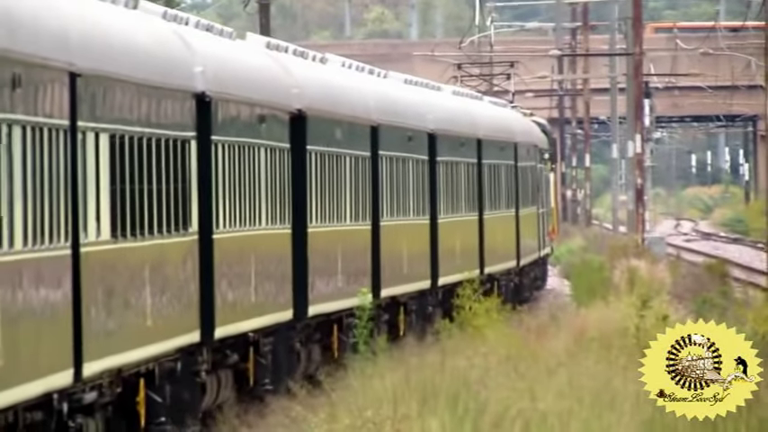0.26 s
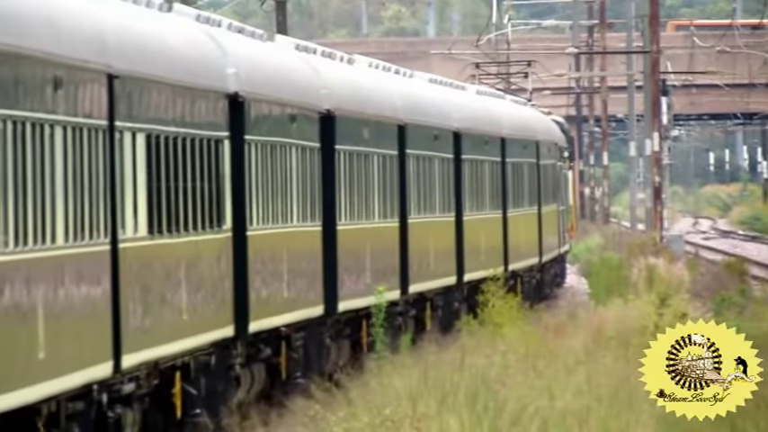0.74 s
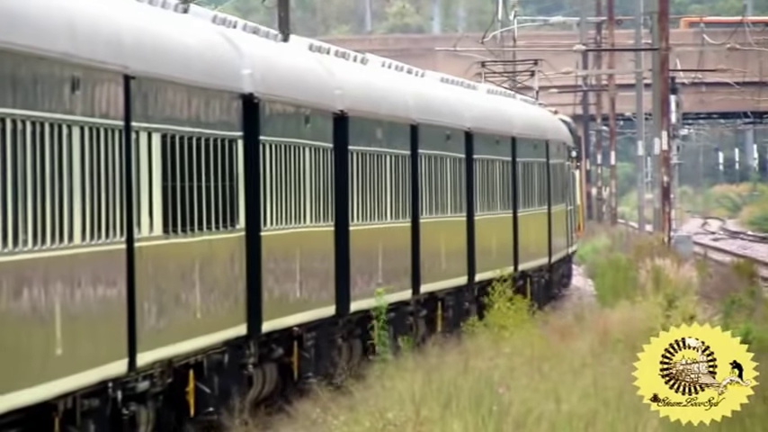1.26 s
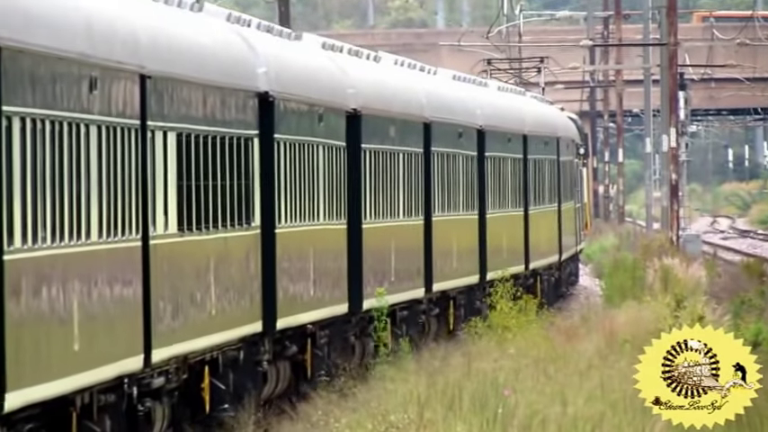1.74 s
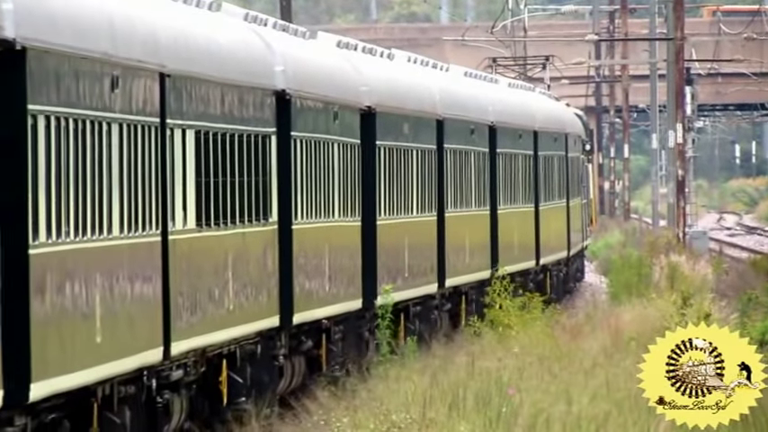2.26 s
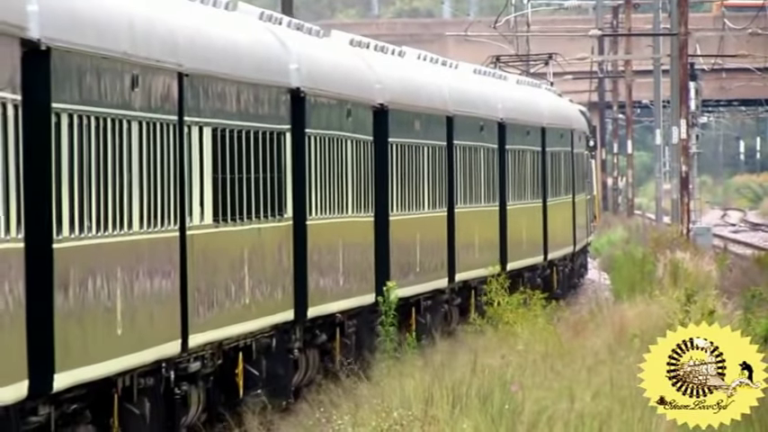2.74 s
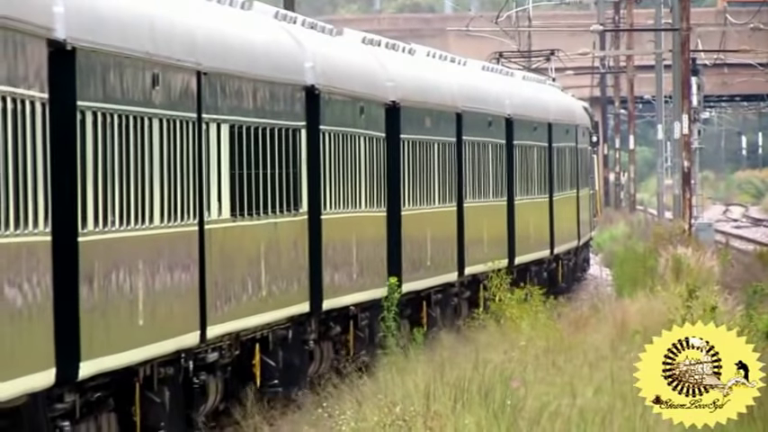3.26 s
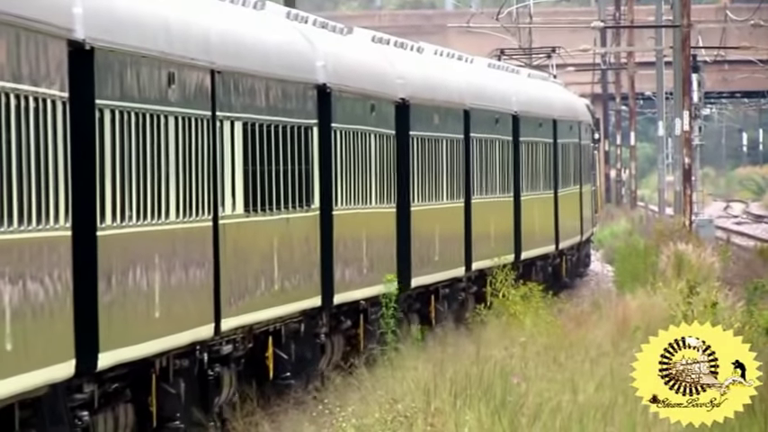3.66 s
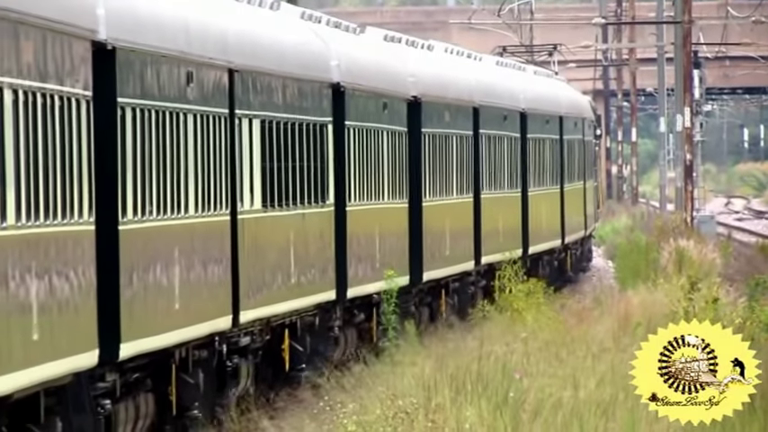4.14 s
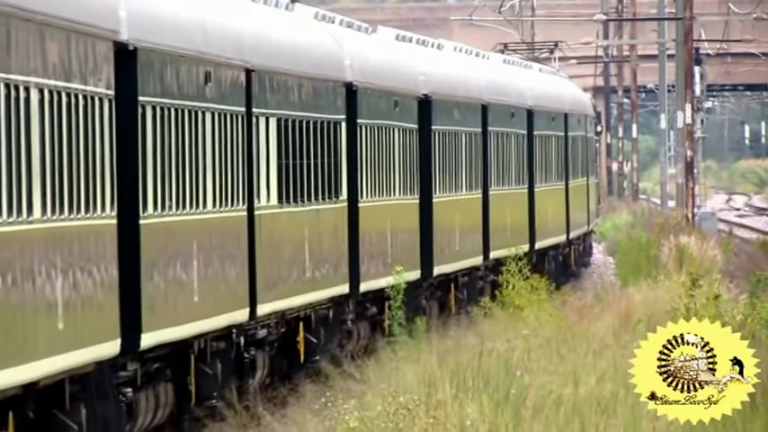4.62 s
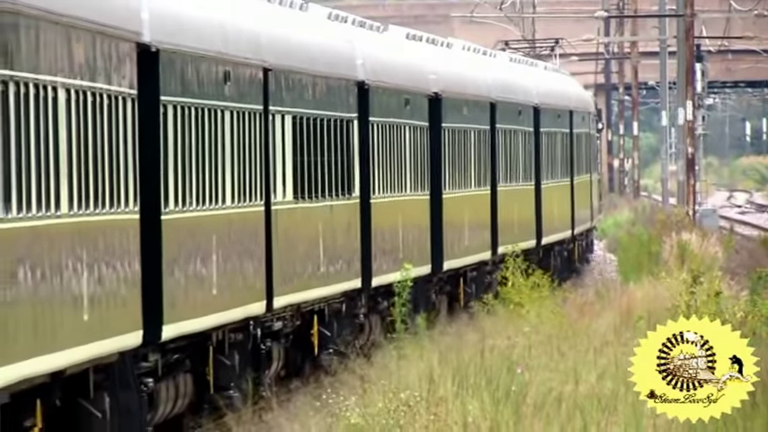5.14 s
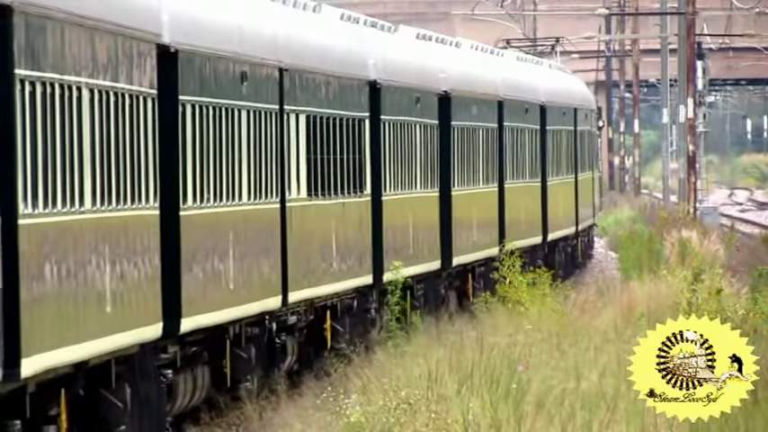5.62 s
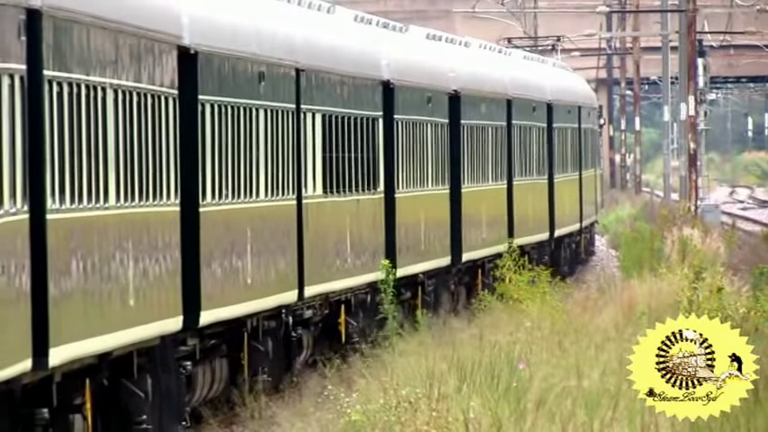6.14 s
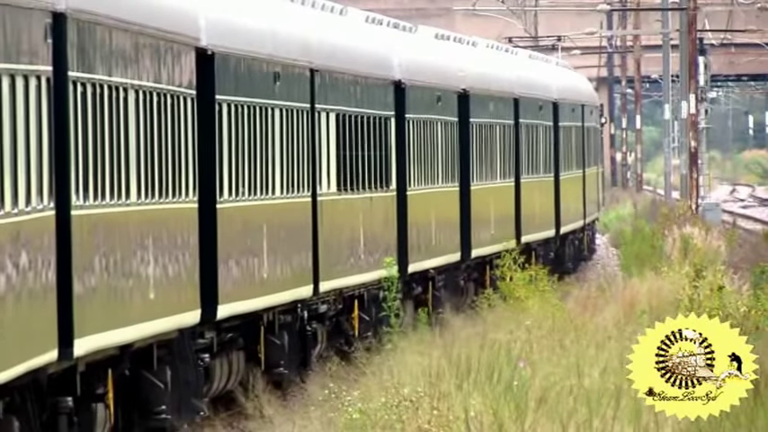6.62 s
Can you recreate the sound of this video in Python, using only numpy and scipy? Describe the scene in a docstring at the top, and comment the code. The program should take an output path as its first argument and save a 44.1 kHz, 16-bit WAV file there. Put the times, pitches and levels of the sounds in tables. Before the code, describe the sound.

A few metres from a curved outdoor track, passenger coaches roll slowly past, nearer the left side. Low rumble, mid-range rail roar and faint wheel hiss continue throughout. Heavy clanking thumps arrive early in quick groups, then lighter knocks, another strong hit past the middle, and more clatter near the end. Loose links tick and short dull echoes scatter beneath the floors.

```python
"""Coaches rolling over rail joints

Passenger coaches roll slowly past on a curve, a few metres away, their layers of shaped noise swelling and fading.
Steel wheels roar on the rails over the rumble of the coach bodies. Axle after axle drops into a rail joint:
low sine bounces thump the track, the bogie (wheel frame) knocks, and short noise bursts clank as steel.
Loose running gear rattles as ticks and knocks, and a short tail scatters under the coach floors."""
import sys
import numpy as np
from scipy import signal
from scipy.fft import rfft, irfft, next_fast_len
from scipy.io import wavfile
from scipy.ndimage import uniform_filter1d

SR = 44100
rng = np.random.default_rng(int(sys.argv[2]) if len(sys.argv) > 2 else 0)


def wav_record(signal):
    """Record a signal, one row per channel, as 16-bit PCM in the file named by sys.argv[1]."""
    frames = np.transpose(np.atleast_2d(signal))
    bounded = np.clip(frames, -1, 1)
    # unit amplitude maps onto the largest positive 16-bit level
    quanta = np.round(bounded * 32767).astype(np.int16)
    wavfile.write(sys.argv[1], SR, quanta)


N = 303849  # length [samples]

# In all noise colour tables only the shape counts: noise() evens out the overall level.


def amp(db):
    """Turns decibels into a gain."""
    return 10 ** (np.asarray(db) / 20)


def unit(x):
    """Scales to an average strength (rms) of 1."""
    return x / np.sqrt(np.mean(x ** 2) + 1e-20)


def read(points, hz):
    """Reads a table between its points, on a log-frequency axis."""
    f, value = np.transpose(points)
    return np.interp(np.log(hz + 1), np.log(f + 1), value)


def add(mix, s, sound):
    """Mixes a sound in at time s."""
    part = mix[:, max(round(s * SR), 0):][:, :sound.shape[-1]]
    part += sound[..., :part.shape[1]]


def level(points):
    """Gain over time from a table of (time [s], level [dB])."""
    return amp(np.interp(np.arange(N) / SR, *np.transpose(points)))


# resonances of wheel and rail at full share: (pitch [Hz], width [Hz], lift [dB])
STEEL_RESONANCES = [(530, 30, -2.5), (589, 25, 1.5), (1017, 61, 5), (1294, 99, 2.5), (1495, 77, -1.5),
                    (1685, 120, 4), (2098, 150, 4.5), (2506, 140, 3.5)]


def steel_db(hz, variety=0.):
    """Lift [dB] by the wheel and rail resonances; with variety, every call favours them differently."""
    favour = 1 + variety * rng.standard_normal(len(STEEL_RESONANCES))
    lifts = 0
    for k, (f, width, db) in zip(favour, STEEL_RESONANCES):
        lifts = lifts + k * db * np.exp(-((hz - f) / width) ** 2)
    return lifts


# how alike left and right are at spread 1, before limiting to 0-1: (frequency [Hz], likeness [1 = same])
LEFT_RIGHT_LIKENESS = [(60, 0.8), (130, 1.23), (330, 0.64), (600, 0.57), (800, 1.42), (1300, 0.48),
                       (1600, 0.31), (2400, 0.76), (3100, 0), (3600, 0.58), (4400, .5), (5400, 0.35),
                       (6200, -0.4)]


def noise(spectrum, spread=1., variety=0., lift=1., size=N):
    """Stereo noise coloured by a share (lift) of the steel; a small spread is a compact source, alike on both sides."""
    hz = np.fft.rfftfreq(size, 1 / SR)
    a, b, c, d = rng.standard_normal((4, len(hz)))
    same = np.clip(1 - spread * (1 - read(LEFT_RIGHT_LIKENESS, hz)), 0, 1)
    left = a + 1j * b
    right = same * left + np.sqrt(1 - same ** 2) * (c + 1j * d)
    colour_db = read(spectrum, hz) + lift * steel_db(hz, variety)
    return unit(irfft(np.array([left, right]) * amp(colour_db), size))


def uneven(x, patch_db, flutter_db, size=10, count=2):
    """Rough treads: patches of pitch and time swell and fade, and the whole band flutters."""
    z = signal.stft(x, nperseg=2048, noverlap=1536)[2]
    patches = rng.standard_normal(z.shape[1:])
    # each patch is count frames long and size frequency bins wide
    patches = uniform_filter1d(patches, size=count, axis=1)
    patches = unit(uniform_filter1d(patches, size=size, axis=0))
    flutter = unit(uniform_filter1d(rng.standard_normal(z.shape[2]), size=6))
    z = z * amp(patch_db * patches + flutter_db * flutter)
    return unit(signal.istft(z, nperseg=2048, noverlap=1536)[1][:, :N])


def swell(t, peak_s):
    """Envelope of a cushioned blow: builds to 1 at peak_s and dies away."""
    return (t / peak_s * np.exp(1 - t / peak_s)) ** 2


def strike(t, rise_s, decay_s):
    """Envelope of a harder blow: it rises smoothly while the ring decays; its peak is 1."""
    envelope = (1 - np.exp(-(t / rise_s) ** 2)) * np.exp(-t / max(decay_s, .003))
    return envelope / envelope.max()


def chatter(t, depth_db=5, size=130):
    """Steel meets steel in many tiny impacts, a few milliseconds apart."""
    jolts = np.tanh(unit(uniform_filter1d(rng.standard_normal(len(t)), size=size)))
    return unit(amp(depth_db * jolts))


# rolling swells as the bogies at the coach ends come near; only ups and downs around the average count,
# and ground, rumble, rails and hiss each follow their own share of them: (time [s], level [dB])
BOGIE_NEARNESS = [(0.0, -34.5), (0.3, -35), (0.5, -33), (0.77, -34.5), (2.19, -35), (2.32, -35.5),
                  (2.9, -36), (4.11, -32.5), (5.37, -33.5), (5.74, -35.5), (6.89, -32.5)]


def passing(level_db, follows, fade_db_per_s=0.):
    """Gain of a rolling layer: it follows a share of the bogies' swell and may drift slowly along the train."""
    t = np.arange(N) / SR
    near_db = np.interp(t, *np.transpose(BOGIE_NEARNESS))
    return amp(level_db + follows * (near_db - near_db.mean()) - fade_db_per_s * (t - t.mean()))


# colour of the shaking track bed: (frequency [Hz], level per Hz [dB])
GROUND_COLOUR = [(12, -13.5), (25, -4), (38, 4.5), (62, 2.5), (105, 4.5), (140, 1), (200, -16),
                 (500, -72.5)]


def ground():
    """The track bed shakes under the passing weight: deep noise."""
    shaking = uneven(noise(GROUND_COLOUR, spread=1.2), patch_db=1.0, flutter_db=1.1, size=2, count=10)
    return shaking * passing(-43.5, follows=0.46)


# colour of the coach bodies: (frequency [Hz], level per Hz [dB])
RUMBLE_COLOUR = [(70, -18.5), (160, -3.5), (200, -1), (270, 3), (340, -0.1), (420, -3.5), (520, -3.5),
                 (700, -12), (1100, -13), (3000, -83.5)]


def rumble():
    """The large coach bodies rumble: low noise that follows the bogies closely."""
    bodies = uneven(noise(RUMBLE_COLOUR), patch_db=1.7, flutter_db=0.5, size=3, count=7)
    return bodies * passing(-32.5, follows=1.12, fade_db_per_s=0.37)


# colour of the roaring rails: (frequency [Hz], level per Hz [dB])
RAIL_COLOUR = [(200, -20.5), (500, -1.5), (750, -5.5), (1100, -1), (1350, -0.5), (1600, -9), (2500, -29.5),
               (6000, -75)]


def rails():
    """The rails roar under the wheels: noise in the middle range."""
    roar = uneven(noise(RAIL_COLOUR), patch_db=1.43, flutter_db=-0.74, size=3, count=7)
    return roar * passing(-35.5, follows=0.34, fade_db_per_s=0.5)


# colour of the rolling wheels: (frequency [Hz], level per Hz [dB])
WHEEL_COLOUR = [(900, -20), (1350, -7.5), (1650, 2.5), (2200, 0.5), (2750, -2), (3300, -5), (4000, -9),
                (6000, -27), (10000, -66.5)]
# the wheels ring loudest as the first bogie comes near: (time [s], level [dB])
WHEEL_LOUDNESS = [(0, -38), (.3, -38.5), (.55, -35.5), (.8, -37), (1.5, -39), (2.5, -41.5), (3.3, -41),
                  (4.1, -39), (4.9, -39.5), (5.4, -39.5), (5.8, -43.5), (6.89, -39.5)]


def wheels():
    """The rolling wheels ring: noise gathered around the steel's own pitches."""
    ring = uneven(noise(WHEEL_COLOUR), patch_db=1.54, flutter_db=0.78, size=3, count=9)
    return ring * level(WHEEL_LOUDNESS)


# colour of the spots where wheel touches rail: (frequency [Hz], level per Hz [dB])
HISS_COLOUR = [(1500, -18.5), (3000, 5.5), (4000, 1.5), (5000, 2), (5900, -1.5), (7000, -8.5),
               (8000, -15.5), (8900, -22.5), (9500, -57.5)]


def hiss():
    """The small spots where wheel touches rail hiss: high noise."""
    contact = uneven(noise(HISS_COLOUR, spread=0.72), patch_db=3.0, flutter_db=1.0, size=2, count=10)
    return contact * passing(-48.5, follows=0.98, fade_db_per_s=-0.06)


# colour of a flange (wheel rim) on the curve: (frequency [Hz], level per Hz [dB])
FLANGE_COLOUR = [(4000, -45.5), (5400, -4), (5850, 3), (6300, -10.5), (8000, -48)]
# loudness of the flange: (time [s], level [dB])
FLANGE_LOUDNESS = [(0, -60), (1.4, -60.5), (2.3, -72.5), (6.89, -75)]


def flange():
    """A flange rubs along the curve: a thin hiss in a narrow band."""
    return noise(FLANGE_COLOUR) * level(FLANGE_LOUDNESS)


def rolling():
    """All the steady sounds of the rolling train together."""
    return ground() + rumble() + rails() + wheels() + hiss() + flange()


# the coach body shudders on its springs after a heavy blow:
# (time [s], level [dB], average pitch [Hz], decay [s])
BODY_SHUDDERS = [(0.625, -30, 94.4, 0.05), (0.974, -30, 106.3, 0.072), (1.735, -27, 99.4, 0.081),
                 (2.041, -33.5, 95, .12), (4.475, -28, 101, 0.058), (5.21, -34.5, 102.7, 0.029),
                 (5.55, -35.5, 92, 0.098)]


def shudders(rise_s=0.023, waver=0.042, size=24000):
    """The coach body drones on at a low, slightly unsteady pitch."""
    out, t = np.zeros((2, N)), np.arange(size) / SR
    for s, db, hz, decay_s in BODY_SHUDDERS:
        drift = unit(uniform_filter1d(rng.standard_normal(size), size=1200))
        turns = np.cumsum(hz * (1 + waver * drift)) / SR
        add(out, s, amp(db) * np.sin(2 * np.pi * turns) * strike(t, rise_s, decay_s))
    return out


def underframe(x, echo_db=-9.5, decay_s=0.048, size=20000):
    """Blows scatter between the coach floors and the ballast (track stones), leaving a short dull tail."""
    t = np.arange(size) / SR
    hits = rng.standard_normal((2, size))
    kept = rng.random((2, size)) < 2000 / SR  # about 2000 echoes per second
    taps = hits * kept * strike(t, 0.012, decay_s)
    tail = signal.fftconvolve(x, taps / np.linalg.norm(taps[0]), axes=1)[:, :N]
    dull = signal.butter(1, [150, 2500], "band", fs=SR, output="sos")
    return amp(echo_db) * signal.sosfilt(dull, tail)


# colour of the bogie's knock, also used by frames() and knock(): (frequency [Hz], level per Hz [dB])
KNOCK_COLOUR = [(60, -24), (170, -3.5), (240, 8.5), (290, 7), (400, -8.5), (530, -10), (700, -9.5),
                (1400, -8.5), (5000, -74)]
# colour of a sharp crack, also used by blow(): (frequency [Hz], level per Hz [dB])
CRACK_COLOUR = [(1200, -14.5), (2000, 2), (3100, 11.5), (4000, 9), (5500, 3.5), (7000, -9), (8500, -18.5),
                (10000, -70)]


def rattles(per_s=12.0, knock_db=-42.5, chink_db=-55.5, size=4096):
    """Couplings and fittings knock and chink lightly at random."""
    t = np.arange(size) / SR
    chance, strength = rng.random((2, N))
    jolts = (chance < per_s / SR) * amp(-9. * strength)
    envelope = signal.oaconvolve(jolts, strike(t, 0.005, 0.031))[:N]
    knocks = amp(knock_db) * noise(KNOCK_COLOUR, spread=0.65)
    chinks = amp(chink_db) * noise(CRACK_COLOUR, spread=.6)
    return envelope * (knocks + chinks)


# a wheel flange rubs the rail head for a moment: (time [s], level [dB], pitch [Hz], length [s])
FLANGE_SCRAPES = [(0.24, -37, 2400, 0.074), (2.008, -38, 2540, 0.048), (5.175, -41, 2300, 0.046)]
# colour of a scrape around its pitch: (multiple of the pitch [1], level per Hz [dB])
SCRAPE_COLOUR = [(.6, -41), (.9, -5), (1, 1.5), (1.12, -14), (1.65, -15), (2.6, -62)]


def scrapes():
    """A flange grazes the rail: a short gritty rasp that swells and stops."""
    out, t = np.zeros((2, N)), np.arange(8192) / SR
    for s, db, hz, length_s in FLANGE_SCRAPES:
        arch = np.sqrt(abs(np.sin(np.pi * np.minimum(t / length_s, 1))))
        band = [(hz * multiple, lift) for multiple, lift in SCRAPE_COLOUR]
        rasp = noise(band, spread=0.35, lift=0, size=len(t))
        add(out, s, amp(db) * rasp * arch * chatter(t))
    return out


# loose links of the brake rigging (rods) rattle: (time [s], level [dB], pitch [Hz], decay [s])
LOOSE_LINKS = [(0.242, -39, 3600, .03), (0.933, -33.5, 3960, .014), (0.957, -33.5, 3700, .014),
               (0.975, -32.5, 2300, .012), (0.985, -36.5, 3700, .018), (1.652, -37, 2660, .01),
               (1.668, -36, 2400, 0.012), (1.688, -36, 3560, .014), (1.718, -38, 2500, .012),
               (3.495, -40.5, 3880, .012), (4.432, -24, 2950, .008), (4.474, -34.5, 2400, .022),
               (5.184, -38, 2600, .008), (5.205, -33, 2900, 0.0085), (5.532, -43, 2600, 0.011),
               (6.261, -40, 3600, 0.01), (6.606, -39, 3320, 0.012), (6.621, -43, 4600, .014),
               (6.655, -46, 4200, .014), (6.71, -40, 4000, .008), (6.735, -42, 3700, .014),
               (6.773, -51, 4200, .01)]
# colour of a link around its pitch: (multiple of the pitch [1], level per Hz [dB])
LINK_COLOUR = [(.35, -27.5), (.6, -3), (1, 3), (1.25, -7.5), (1.55, -13), (2.1, -31.5), (3, -60)]


def links(rise_s=0.0016, size=6000):
    """A loose steel link gives a crisp tick and chatters to rest."""
    out, t = np.zeros((2, N)), np.arange(size) / SR
    for s, db, hz, decay_s in LOOSE_LINKS:
        band = [(hz * multiple, lift) for multiple, lift in LINK_COLOUR]
        ring = noise(band, spread=0.37, lift=0, size=size)
        add(out, s, amp(db) * ring * strike(t, rise_s, decay_s) * chatter(t))
    return out


# the bogie frames knock against their stops: (time [s], level [dB], pitch [Hz])
STOP_KNOCKS = [(0.427, -24.5, 407), (0.599, -25, 225), (0.933, -17, 231.5), (0.984, -28, 292),
               (1.655, -24, 220), (1.684, -28, 498), (1.707, -15, 279), (2.02, -30.5, 230),
               (3.119, -16.5, 296), (3.238, -27.5, 213), (3.425, -25.5, 223), (3.623, -26, 252),
               (4.085, -26.5, 327), (4.436, -24.5, 212), (5.18, -29.5, 324), (5.2, -22.5, 271),
               (5.24, -23.5, 268), (5.533, -23, 286), (6.268, -23, 417), (6.479, -24, 205),
               (6.603, -21.5, 228), (6.709, -21.5, 307), (6.86, -25.5, 327)]


def frames(rise_s=0.0035, ring_cycles=2.3, overtone=1.72, overtone_db=-9, clatter_db=-10, size=6000):
    """A bogie frame hits its stop: a hollow knock of a few cycles, an overtone and some clatter."""
    out, t = np.zeros((2, N)), np.arange(size) / SR
    for s, db, hz in STOP_KNOCKS:
        tone = np.sin(2 * np.pi * hz * t)
        tone = tone + amp(overtone_db) * np.sin(2 * np.pi * (overtone * hz * t + rng.random()))
        clatter = amp(clatter_db) * noise(KNOCK_COLOUR, spread=0.68, size=size)
        add(out, s, amp(db) * (tone + clatter) * strike(t, rise_s, ring_cycles / hz))
    return out


def thump(t, track_hz=104.2, peak_s=0.013):
    """The axle's weight bounces on the sprung track for a few cycles, each time at a slightly other pitch."""
    return -swell(t, peak_s) * np.sin(2 * np.pi * track_hz * rng.uniform(0.87, 1.05) * t)


def knock(t, frame_hz=296.0, peak_s=0.0096, clatter_db=-1.5):
    """The bogie frame answers with one short tone near frame_hz and a clatter of its parts."""
    tone = swell(t, peak_s) * np.sin(2 * np.pi * frame_hz * rng.uniform(0.92, 1.095) * t)
    clatter = noise(KNOCK_COLOUR, spread=0.33, size=len(t)) * strike(t, 0.0033, 0.037)
    return tone + amp(clatter_db) * clatter


# tones a blow leaves ringing in a wheelset (two wheels on an axle), before random detuning and level
# scatter; levels are relative to the clank or clink: (pitch [Hz], level [dB], decay [s])
WHEELSET_TONES = [(488, -10, 0.064), (535, 3.5, 0.045), (886, -2.5, 0.11), (955, -8.5, 0.21),
                  (1255, -5, 0.22), (1676, -11.5, .07), (2083, -9.5, 0.14), (2460, -7, 0.07),
                  (2750, -7.5, 0.046), (3540, -22.5, 0.055)]


def wheelset(t, clank_db, clink_db, scatter_db=1.0):
    """Ringing tones, at each blow tuned a little differently and excited as if struck at another spot."""
    ring = np.zeros(len(t))
    for hz, db, decay_s in WHEELSET_TONES:
        detune, luck, turn = rng.standard_normal(3)
        drive_db = clank_db if hz < 1500 else clink_db
        tone = np.sin(2 * np.pi * (hz * (1 + 0.01393 * detune) * t + turn))
        ring += amp(drive_db + db + scatter_db * luck) * strike(t, 0.013, decay_s) * tone
    return ring


# colour of the bright snap of the hardest blows: (frequency [Hz], level per Hz [dB])
SNAP_COLOUR = [(1500, -19), (2700, 8), (3200, 3), (4100, -13), (4900, -22), (6200, -8.5), (7200, -13),
               (8800, -13.5), (10000, -31.5)]


def snap(t, clink_db, onset_db=-32.0, full_db=-28, decay_s=0.012):
    """Only a wheel that lands hard and close makes contact brief enough to reach the top octaves."""
    hardness = np.clip((clink_db - onset_db) / 6, 0, 1)
    burst = noise(SNAP_COLOUR, spread=0.24, size=len(t)) * strike(t, 0.0042, decay_s)
    return hardness * amp(full_db) * burst


# colour of the rail's clank: (frequency [Hz], level per Hz [dB])
CLANK_COLOUR = [(150, 4.5), (400, -2.5), (560, 2.5), (700, -2), (880, 2.5), (1050, 0.5), (1350, -3),
                (1700, -8), (4000, -63)]
# colour of a struck wheel: (frequency [Hz], level per Hz [dB])
CLINK_COLOUR = [(900, -4.5), (1550, -4), (2000, 2), (2350, 2), (2900, -1), (3400, -10), (4000, -15.5),
                (5000, -27), (10000, -49)]


def blow(s, force_db, give_db, wheel_db, decay_s, bogie_db, ring_db, sharp_db, size=16000):
    """One wheel lands at time s and excites track, bogie and steel together."""
    out, t = np.zeros((2, N)), np.arange(size) / SR
    thump_db, clink_db = force_db + give_db, force_db + wheel_db
    # a joint that gives way clanks more and cracks less than a stiff one
    clank_db = force_db - 7.5 + 0.69 * give_db
    crack_db = force_db + sharp_db - 0.22 * give_db
    variety = 0.3  # how much the steel's colouring differs from blow to blow
    clank = amp(clank_db) * noise(CLANK_COLOUR, spread=0.51, variety=variety, size=size)
    clink = noise(CLINK_COLOUR, spread=0.48, variety=variety, lift=0.6, size=size)
    clink = amp(clink_db - 4.0) * clink
    crack = amp(crack_db) * noise(CRACK_COLOUR, spread=0.54, size=size)
    steel = (clank + clink) * strike(t, 0.0024, decay_s) + crack * strike(t, 0.0056, 1.66 * decay_s)
    hit = (steel + snap(t, clink_db)) * chatter(t)
    add(out, s, hit + amp(ring_db) * wheelset(t, clank_db, clink_db))
    # the heavy parts move a moment after the steel touches
    add(out, s + 0.00249, amp(thump_db) * thump(t) + amp(force_db + bogie_db) * knock(t))
    # the rail end bends under the arriving wheel: a scrape, played backwards, swells into the blow
    approach = (clank + clink + 3.9 * crack) * strike(t, 0.0073, 0.0046)
    approach = approach[:, size // 2::-1]
    add(out, s + .006 - t[size // 2], amp(-6.5) * approach)
    return out


# wheels dropping into joints. Give of the track, wheel clink (played 4 dB softer) and bogie knock are
# relative to the force; the wheelset ring is on top of the blow's clank and clink levels:
# (time [s], force [dB], give [dB], clink [dB], steel decay [s], knock [dB], ring [dB])
WHEEL_DROPS = [(0.25, -32, 3.5, -2, 0.035, -5, -15), (0.582, -16, 1.5, -18.5, 0.032, -4, -11),
               (0.926, -18, 4, -4, 0.047, -7, -16), (1.649, -17.5, 0.5, -11.5, 0.065, -7, -4),
               (1.997, -23.5, 5.5, -9, 0.068, -8, -7.5), (2.159, -25, -9, -13, 0.028, -3, -5),
               (2.51, -31, -3.5, -9, 0.02, 2, -16), (2.777, -30.5, -3.5, -14, 0.027, -5, -19),
               (3.119, -25, -6.5, -13.5, 0.04, -13, -11), (3.416, -30, 1.5, -13, 0.029, -0.5, -18),
               (3.765, -27.5, -3, -24, 0.025, -7.5, -9), (4.096, -26.5, 8, -8, 0.021, -7.5, -21),
               (4.43, -18, 4, -5, 0.043, -6, -13.5), (4.828, -27.5, -0.5, -19, 0.034, -7.5, -15),
               (5.151, -23, 5, -7.5, 0.056, -11, -9), (5.492, -24, 2.5, -7.5, 0.07, -8.5, -9),
               (6.261, -19.5, -4, -13, 0.031, -3.5, -10), (6.605, -22.5, -4, -20, 0.033, -13.5, -11),
               (6.705, -26, -3, -17, .025, -5, -12)]
# after a heavy blow the bogie springs up and lands again; give is relative to the force:
# (time [s], force [dB], give [dB])
BOGIE_REBOUNDS = [(0.654, -28, -1), (0.997, -29.5, 5), (1.7, -22, 4), (4.493, -33.5, 3.5),
                  (5.195, -22.5, -6), (5.535, -24.5, -6)]


def joints():
    """Each wheel drops into the rail gap; heavy blows are followed by a rebound with less crack."""
    drops = sum(blow(*row, sharp_db=-19) for row in WHEEL_DROPS)
    rebounds = sum(blow(*row, wheel_db=-11.5, decay_s=0.03, bogie_db=-5.5, ring_db=-10.5, sharp_db=-21.5)
                   for row in BOGIE_REBOUNDS)
    return drops + rebounds


# head start of the left side, reduced below 120 Hz: (frequency [Hz], phase lead [radians])
LEFT_LEAD = [(100, 0.36), (190, 0.94), (280, 0.67), (430, 1.04), (1100, 1.69), (1550, 2.88), (2000, 5.1),
             (2500, 7.2), (3200, 8.17), (4100, 8.18), (5500, 9.5), (8000, 16)]
# left minus right: (frequency [Hz], level difference [dB])
LEFT_BALANCE = [(60, -2.5), (130, -1.5), (250, 1), (420, 1), (600, 3), (1000, 2.5), (1500, 1.5), (2200, 4),
                (3500, 3), (5700, 0.5), (7000, 8.5), (9000, 1)]


def place_left(train):
    """The train passes on the left: its sound reaches the left side earlier and brighter."""
    size = next_fast_len(N + 4096)
    hz = np.fft.rfftfreq(size, 1 / SR)
    # the longest waves reach both sides in step
    lead = read(LEFT_LEAD, hz) * np.minimum(hz / 120, 1)
    # half of each difference goes to the left, the opposite half to the right
    left = amp(read(LEFT_BALANCE, hz) / 2) * np.exp(.5j * lead)
    return irfft(rfft(train, size) * np.array([left, 1 / left]), size)[:, :N]


def scene():
    """The rolling train, its shudders, and all blows with their tail under the floors."""
    blows = joints() + frames() + links() + scrapes() + rattles()
    train = rolling() + shudders() + blows + underframe(blows)
    return place_left(train)


def record(dry):
    """Removes the highest treble, above about 9950 Hz."""
    lowpass = signal.firwin(511, 9950, window=("kaiser", 9), fs=SR)
    return signal.oaconvolve(dry, lowpass[None], "same")


dry = scene()
out = record(dry)
wav_record(out)
```